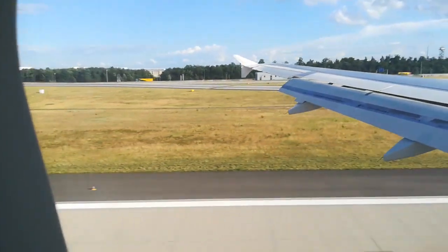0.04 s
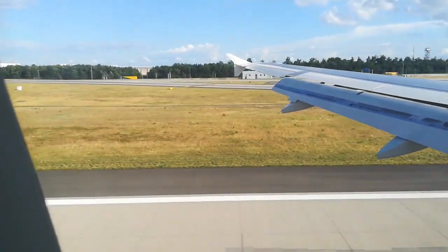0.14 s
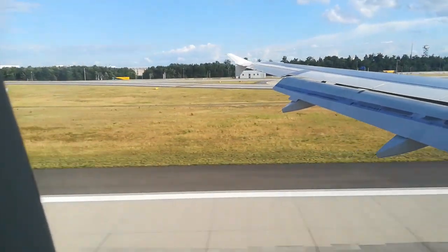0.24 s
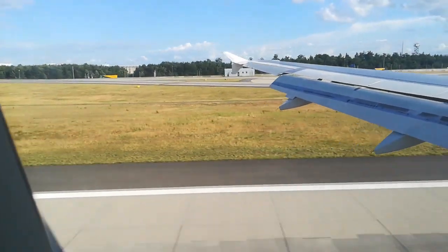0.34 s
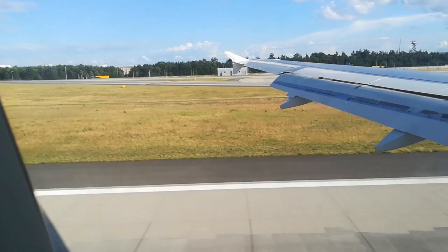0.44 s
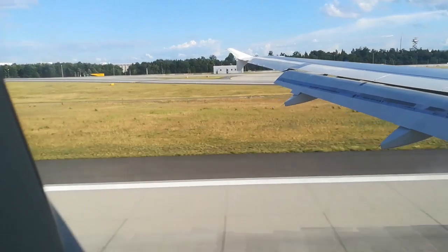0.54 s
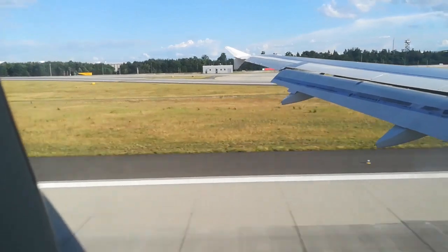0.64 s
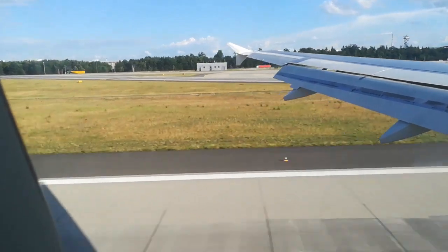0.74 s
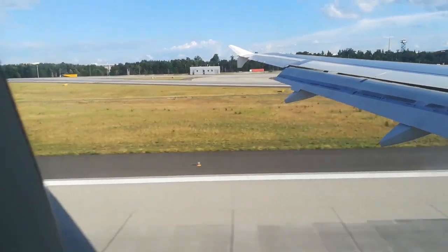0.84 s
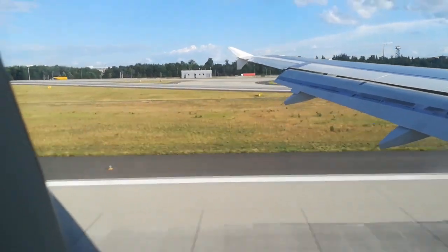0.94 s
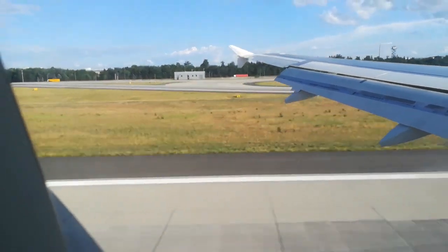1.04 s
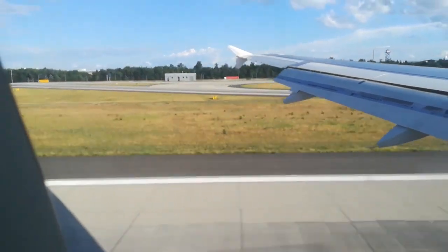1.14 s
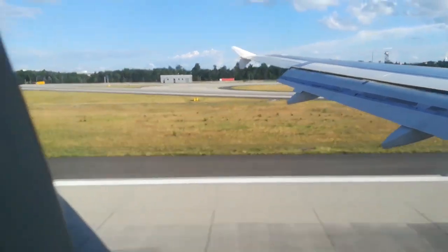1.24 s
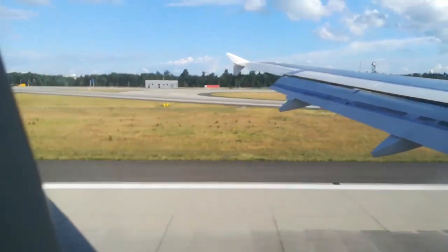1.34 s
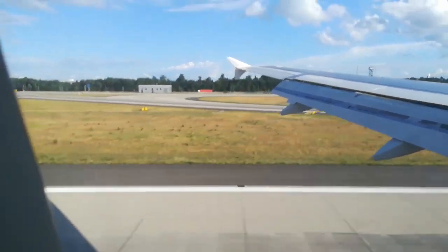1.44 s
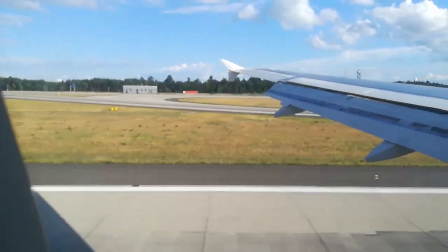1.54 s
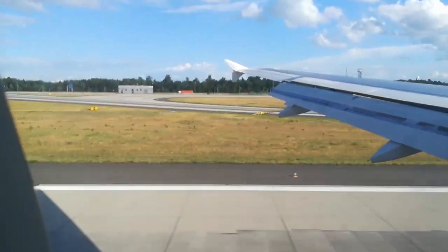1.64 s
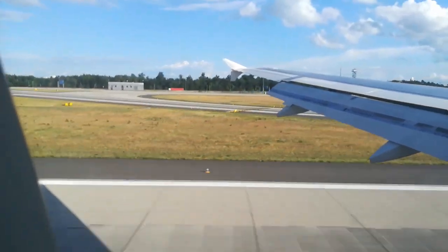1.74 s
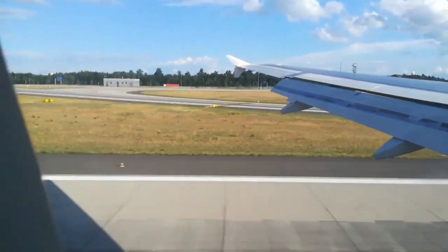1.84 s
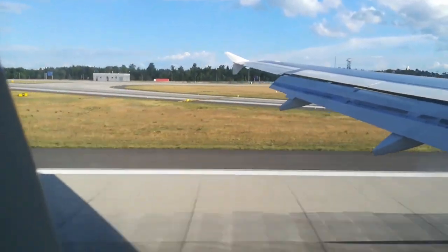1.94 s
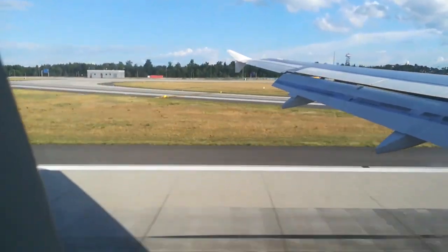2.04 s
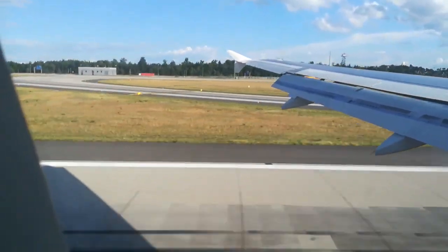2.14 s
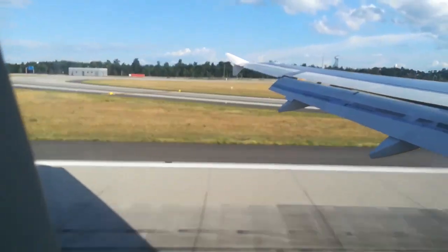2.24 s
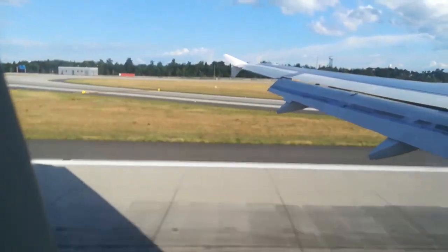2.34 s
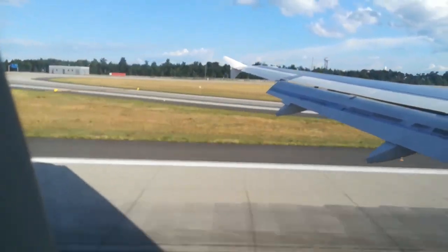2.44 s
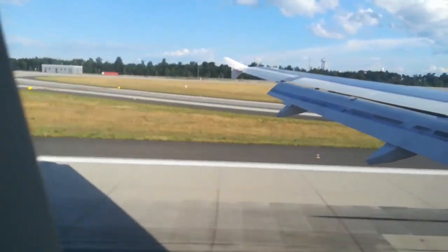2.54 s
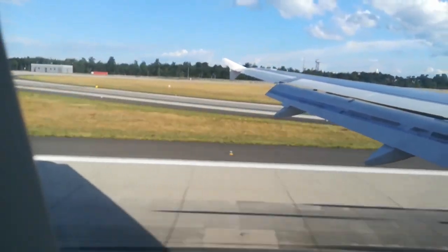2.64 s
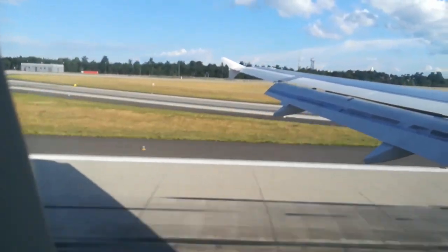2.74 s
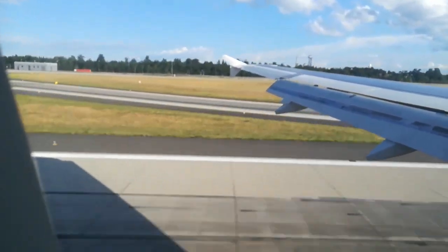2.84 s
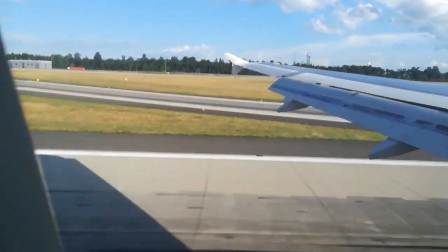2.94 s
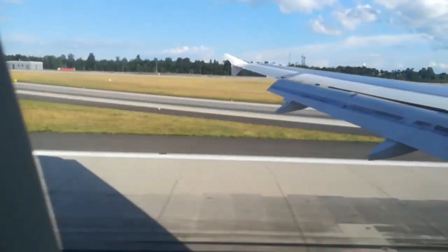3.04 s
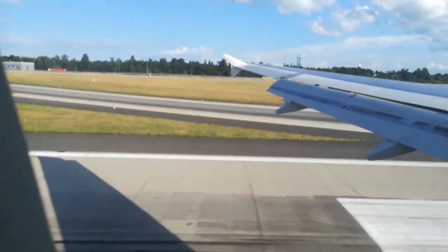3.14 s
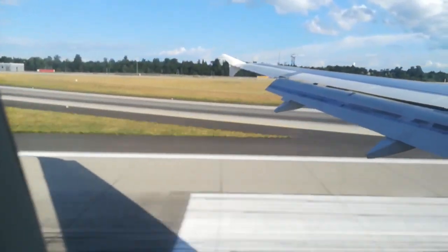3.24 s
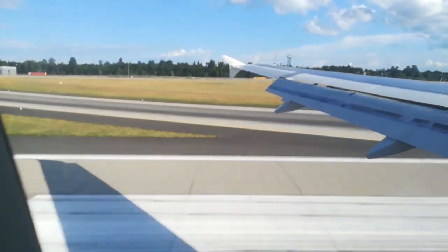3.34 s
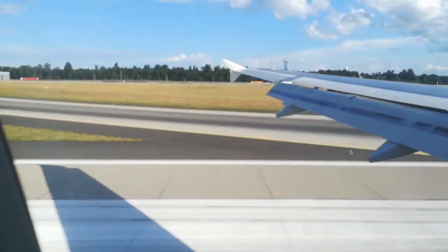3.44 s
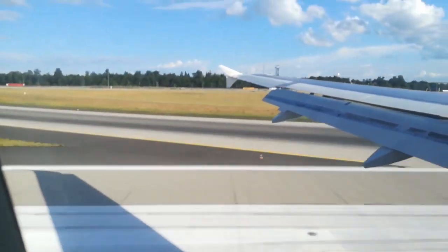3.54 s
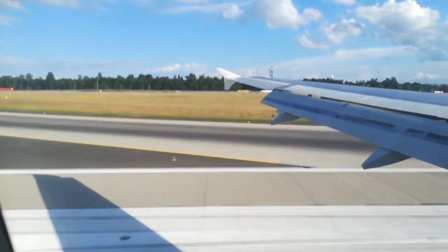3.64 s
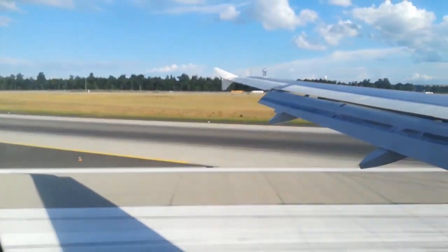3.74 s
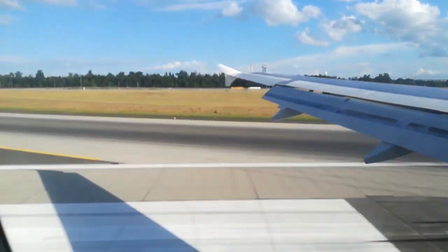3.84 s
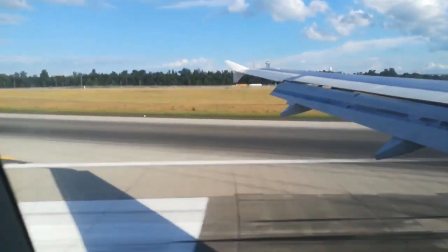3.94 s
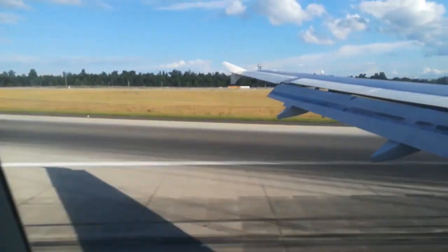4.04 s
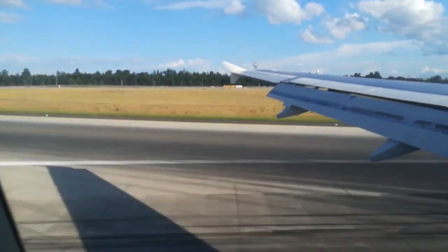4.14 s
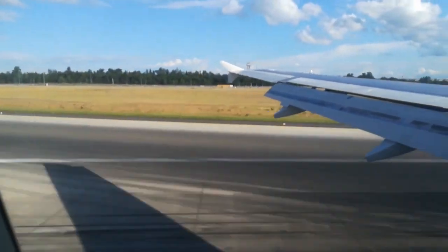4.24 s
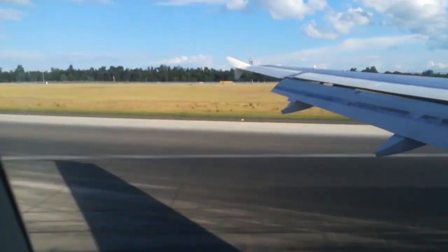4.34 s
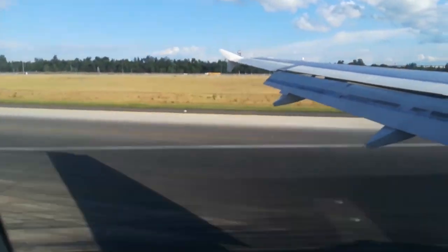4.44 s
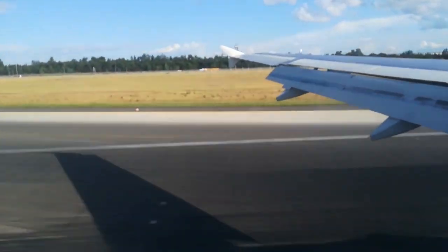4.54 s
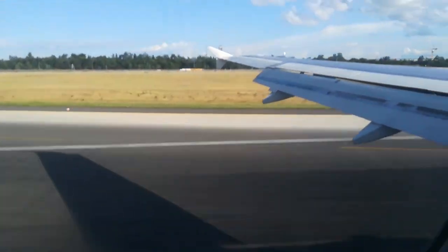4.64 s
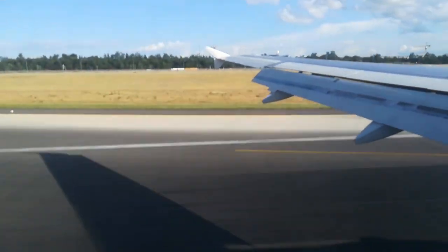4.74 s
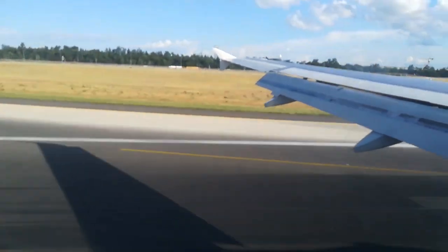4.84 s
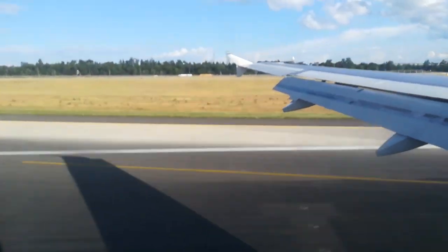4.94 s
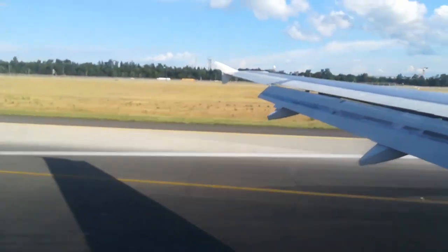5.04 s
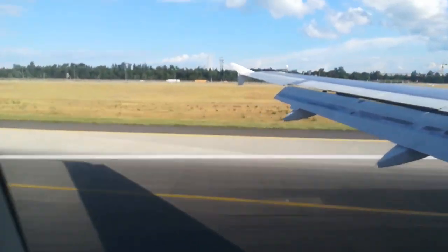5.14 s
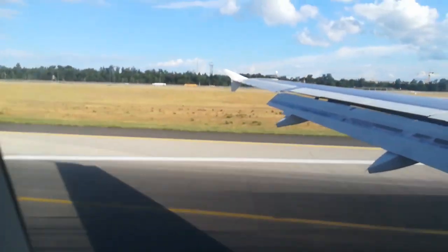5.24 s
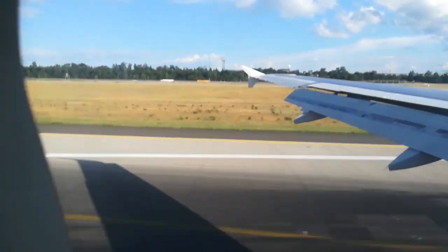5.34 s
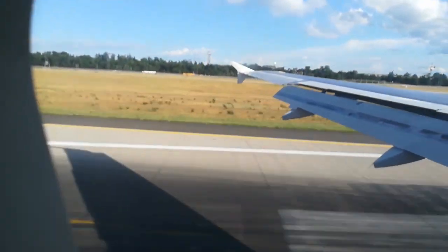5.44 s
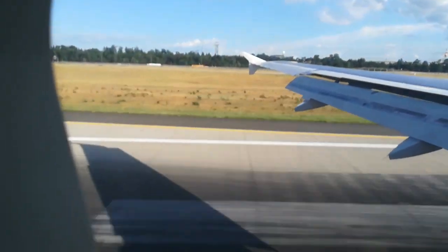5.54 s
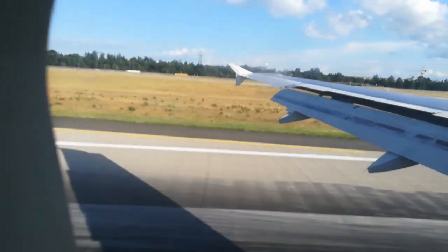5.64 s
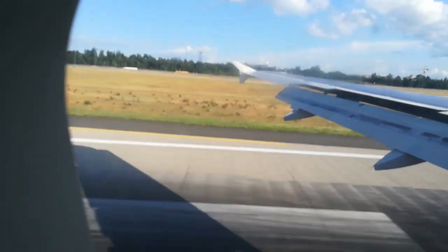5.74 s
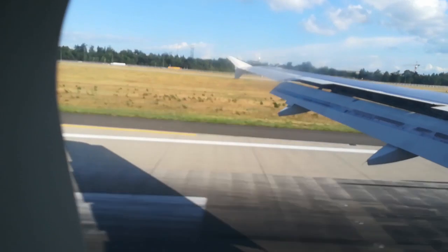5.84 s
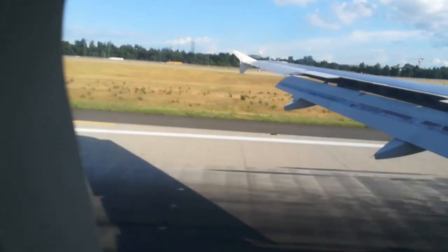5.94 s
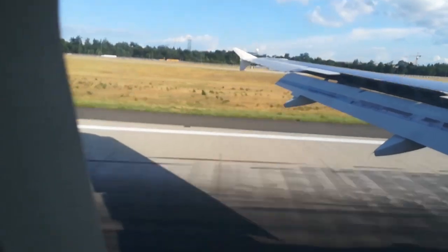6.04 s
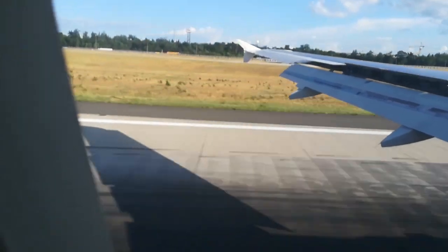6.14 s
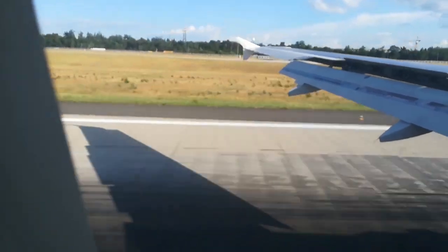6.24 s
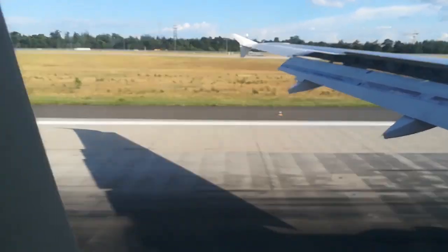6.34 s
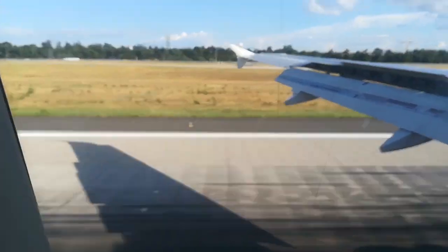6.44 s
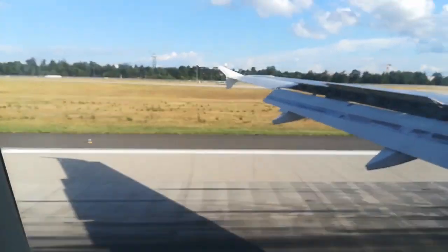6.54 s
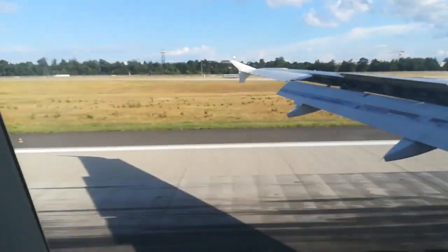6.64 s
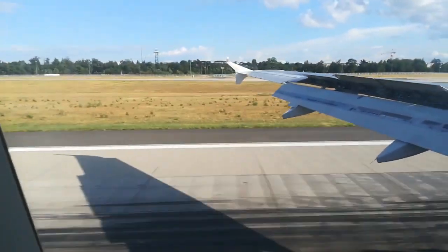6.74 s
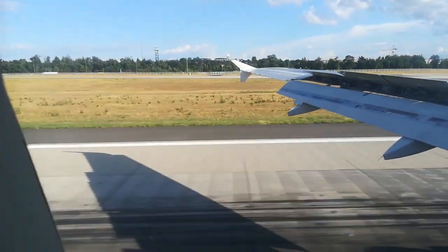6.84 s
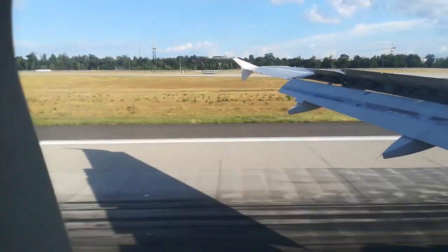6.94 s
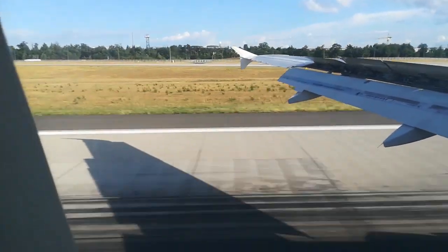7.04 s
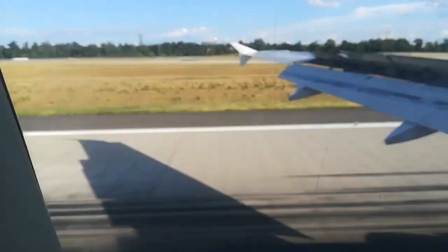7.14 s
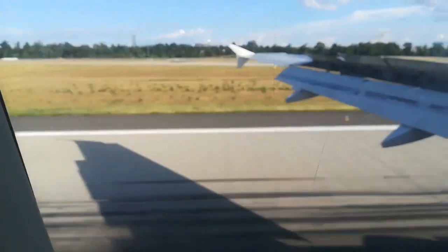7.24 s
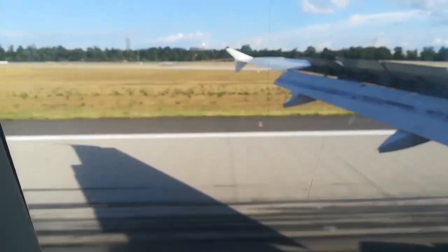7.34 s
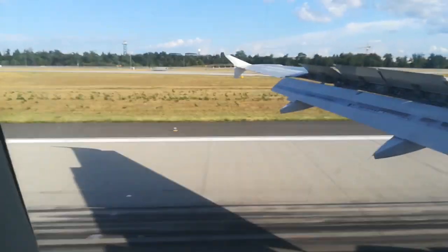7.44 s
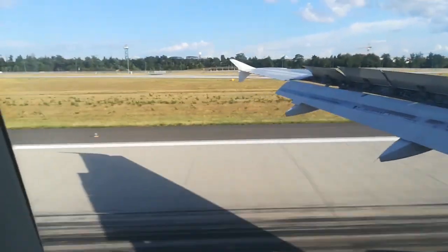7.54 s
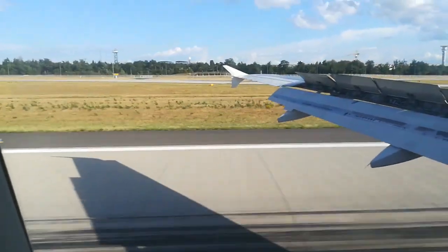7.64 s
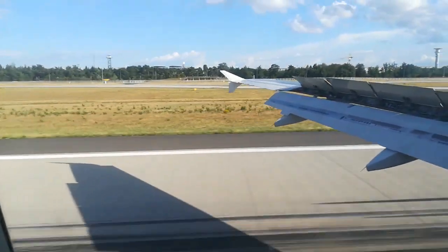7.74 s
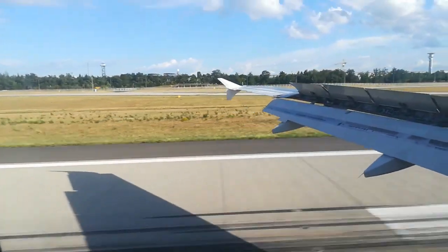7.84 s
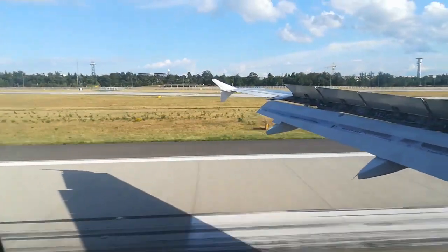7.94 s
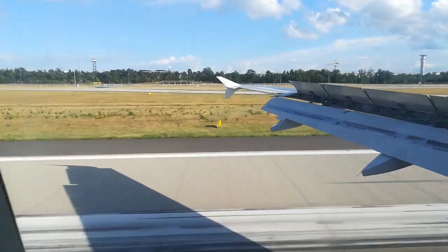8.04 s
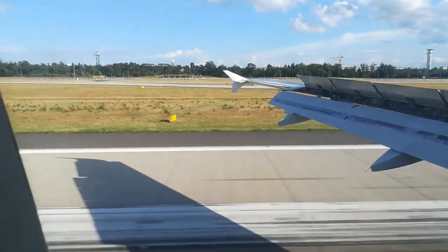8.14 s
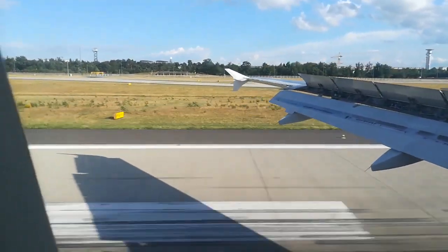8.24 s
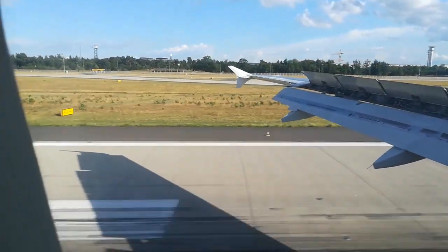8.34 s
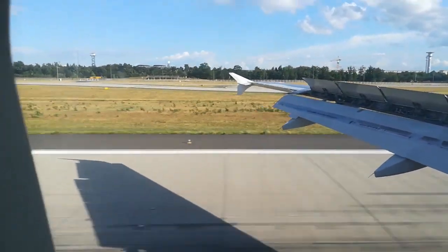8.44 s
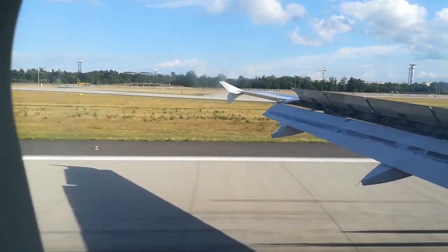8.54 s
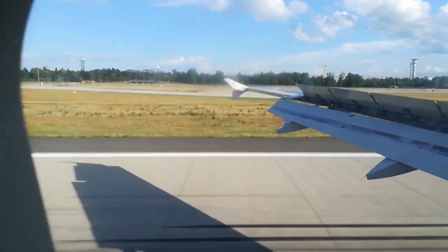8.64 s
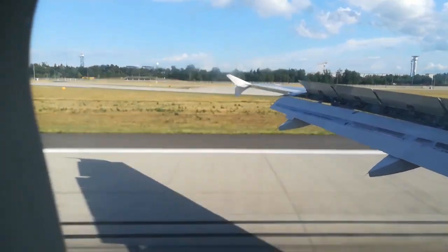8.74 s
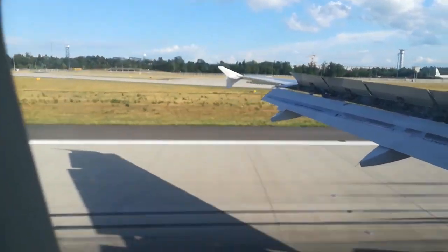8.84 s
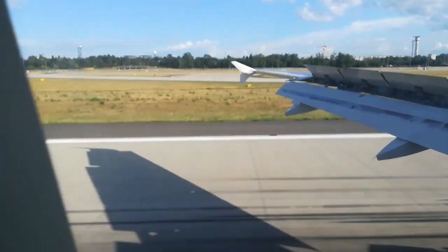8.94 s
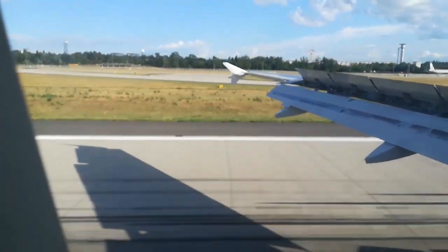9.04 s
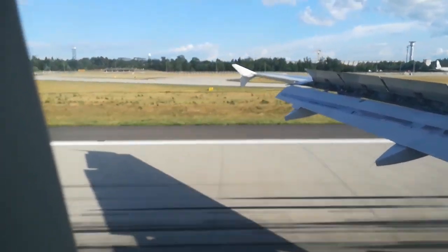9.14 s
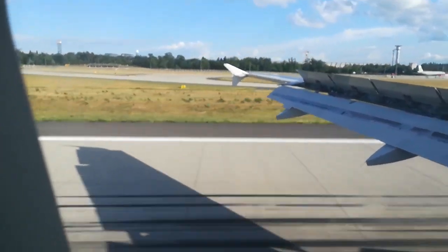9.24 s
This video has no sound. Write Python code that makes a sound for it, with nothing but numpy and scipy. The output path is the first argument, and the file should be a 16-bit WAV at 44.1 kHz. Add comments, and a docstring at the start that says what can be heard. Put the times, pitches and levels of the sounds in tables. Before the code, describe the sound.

A window-seat landing: bassy rushing air and thin whine, a clattering thump, then growing wheel rumble with rustling, rattling plastic trim.

```python
"""Airliner landing, heard from a window seat

Airflow is shaped noise in the cabin's standing waves; winding-down fans and a thin whine are wavering tones.
Touchdown thumps ring damped fuselage modes, then a deep rumble and roar of noise build up with the wheel load.
Plastic trim rustles and squeaks, panels clack, and dull rattles, bright chatters and dry ticks come and go, all
from random micro-impacts; one metal fitting clinks as a set of short ringing modes."""
import sys
import numpy as np
from scipy import signal
from scipy.fft import rfft, irfft, next_fast_len
from scipy.io import wavfile
from scipy.ndimage import uniform_filter1d

SR = 44100
rng = np.random.default_rng(int(sys.argv[2]) if len(sys.argv) > 2 else 0)


def dump_mix(stems):
    """Bounce the given channels to the path in sys.argv[1] as a 16-bit WAV at rate SR."""
    frames = np.atleast_2d(stems).T  # one column per channel
    limited = np.clip(frames, -1, 1)  # hard clip at full scale
    pcm = np.round(limited * 32767).astype(np.int16)
    wavfile.write(sys.argv[1], SR, pcm)


N = 409688
TIME = np.arange(N) / SR


def from_db(db):
    """Decibels to gain."""
    return 10 ** (np.asarray(db) / 20)


def rms(x):
    """Root mean square."""
    return np.sqrt(np.mean(x ** 2) + 1e-20)


def colour(x, points):
    """Filter by a (f/Hz, level/dB) spectrum, interpolated over log frequency."""
    size = x.shape[-1]
    hz, db = np.transpose(points)
    bins = np.maximum(np.fft.rfftfreq(size, 1 / SR), 1)
    gain = from_db(np.interp(np.log(bins), np.log(hz), db))
    return irfft(rfft(x) * gain, size)


def butter(x, hz, kind, order=2):
    """Causal low-, high- or band-pass."""
    return signal.sosfilt(signal.butter(order, hz, kind, fs=SR, output="sos"), x)


def split(x, hz):
    """The parts below and above a frequency; they add up to the whole."""
    sos = signal.butter(3, hz, fs=SR, output="sos")
    low = signal.sosfiltfilt(sos, x, padtype="even")
    return low, x - low


def pan(db):
    """Gains of the two channels for a left-right difference."""
    return from_db(np.array([[db / 2], [-db / 2]]))


def drift(rate):
    """Smooth random wandering with a spread of about 1, from this many random points per second."""
    knots = rng.standard_normal(2000)
    return np.interp(TIME * rate, np.arange(len(knots)), knots) * np.sqrt(3 / 2)


def swells(rows):
    """Sum of bell-shaped swells, one for each (t/s, height, length/s) row."""
    return sum(height * np.exp(-np.minimum((2 * (TIME - s) / length) ** 2, 50))
               for s, height, length in rows)


def steady(x, seconds):
    """Noise with its slow swells evened out, rms about 1."""
    power = uniform_filter1d(np.mean(x, axis=0) ** 2, int(seconds * SR))
    return x / np.sqrt(power + 1e-12)


def impulses(rows):
    """One click for each (t/s, level/dB) row."""
    out = np.zeros(N)
    for s, db in rows:
        out[round(s * SR)] = from_db(db)
    return out


def ring(clicks, hz, t60):
    """A damped resonator: a unit click sets a decaying sine of initial height 1 ringing."""
    radius = from_db(-60 / (t60 * SR))
    angle = 2 * np.pi * hz / SR
    return signal.lfilter([0, np.sin(angle)], [1, -2 * radius * np.cos(angle), radius ** 2], clicks + 1e-18)


def resonance_db(modes, hz):
    """Lift that (f/Hz, width/Hz, lift/dB) resonances give at a frequency."""
    return sum(db / (1 + (2 * (hz - centre) / width) ** 2) for centre, width, db in modes)


def body(x, hz, width_hz, lift_db):
    """A sound together with the resonance that it excites in a part."""
    resonance = signal.lfilter(*signal.iirpeak(hz, hz / width_hz, fs=SR), x + 1e-18)
    return x + from_db(lift_db) * resonance


# resonances of the cabin and its air vents: f/Hz, width/Hz, lift/dB
CABIN_MODES = [(44.4, 1.55, 7), (75, 11, -2), (130, 12, -4.5), (172, 16, 1.5), (354.3, 13.6, 3.5),
               (399.4, 17, 5.5), (3190, 360, 3.5), (5040, 780, 4.5), (9400, 1300, 3.5)]
PORT_LAG_S = 0.00063  # travel time between the two pickup ports


def cabin_field(common, difference, side_db, directed):
    """Noise in the cabin's standing waves, at two close ports; the directed share gives them a phase lag."""
    size = next_fast_len(N, real=True)
    hz = np.fft.rfftfreq(size, 1 / SR)
    modes = from_db(resonance_db(CABIN_MODES, hz))
    pressure, diffuse = rfft(rng.standard_normal((2, size))) * modes
    # direction is clear in the bass and blurs towards the treble
    directness = np.interp(hz, [100, 500, 1200, 6000], [1, .7, .45, .2])
    lag = np.tanh(4 * np.sin(2 * np.pi * hz * PORT_LAG_S))
    share = np.clip(directed, 0, 1) * lag * directness
    gradient = -1j * share * pressure + np.sqrt(1 - share ** 2) * diffuse
    mid = colour(irfft(pressure, size), common)[:N]
    side = colour(irfft(gradient, size), difference)[:N]
    return mid / rms(mid) + from_db(side_db) * side / rms(side) * [[1], [-1]]


def wavering_tone(hz, level_db, width_hz):
    """A tone whose strength and phase are scattered by turbulence, differently at each port."""
    times = np.arange(0, N / SR + 1, 1 / max(width_hz, 1))
    scatter = []
    for _ in range(2):
        knots = rng.standard_normal(len(times)) + 1j * rng.standard_normal(len(times))
        scatter.append(np.interp(TIME, times, knots))
    carrier = np.exp(2j * np.pi * np.cumsum(hz) / SR)
    tone = np.real((.5 + np.array(scatter)) * carrier)
    return from_db(level_db) * tone / rms(tone)


def grains(size, per_s, spread_db, diffuse_db):
    """Stereo micro-impacts of uneven strength in a wash of their reflections, rms 1."""
    strength = from_db(spread_db * rng.standard_normal(size).clip(-2, 2))
    hits = (rng.random(size) < per_s / SR) * rng.choice([-1, 1], size) * strength
    x = hits / rms(hits) + from_db(diffuse_db) * rng.standard_normal((2, size))
    return x / rms(x)


def window_nook(x, count=14):
    """Window, wall and seat backs return quick echoes, other ones at each port, which ripple the spectrum."""
    out = []
    for channel in x:
        lag_s = rng.uniform(.0006, .008, count)
        response = np.zeros(SR // 100)
        response[(lag_s * SR).astype(int)] = .35 * rng.choice([-1, 1], count) * np.exp(-lag_s / .005)
        response[0] = 1  # direct sound
        out.append(signal.oaconvolve(channel, response / np.linalg.norm(response))[:len(channel)])
    return np.array(out)


def shower(s, db, t60, spectrum, rise_s, per_s):
    """One contact: a short shower of micro-impacts in a part, dying away, with the echoes of its own place."""
    out, size = np.zeros((2, N + SR)), SR // 2
    age = np.arange(size) / SR
    burst = colour(grains(size, per_s, spread_db=4, diffuse_db=-2), spectrum)
    decay = from_db(-60 * np.maximum(age - rise_s, 0) / max(t60, .005))
    envelope = np.minimum(age / rise_s, 1) * decay
    start = round((s - rise_s / 2) * SR)
    out[:, start:start + size] = window_nook(from_db(db) * envelope * burst / rms(burst))
    return out[:, :N]


CONTACT_S = 4.2  # the wheels touch


def on_ground(rise_s):
    """0 in the air, rising to 1 after the first contact."""
    return np.clip((TIME - CONTACT_S) / rise_s, 0, 1)


# the spoilers rise and hand the weight to the wheels; later the roll eases as the aircraft slows
SPOILERS_S, LOAD_TIME_S, SLOWING_S, EASE_PER_S = 5.57, 0.68, 8.32, 0.11


def wheel_load():
    """How hard the wheels work, 0-1: it builds once the spoilers are up and eases with the speed."""
    weight = 1 - np.exp(-np.maximum(TIME - SPOILERS_S, 0) / LOAD_TIME_S)
    return weight * np.exp(-EASE_PER_S * np.maximum(TIME - SLOWING_S, 0))


# airflow and engine noise, in common to both ports and as their difference: f/Hz, relative level/dB
AIR_COMMON = [(12, -59), (30, -6.5), (54, -1), (125, -7), (182, -9.5), (316, -20), (377, -29.5),
              (462, -29.5), (600, -40.5), (927, -43.5), (1430, -46.5), (3050, -52.5), (6300, -65),
              (15500, -69)]
AIR_DIFFERENCE = [(10, -41), (70, -6), (118, -3), (258, 0), (335, -3.5), (388, -9.5), (448, -5.5),
                  (549, -8), (900, -12), (1430, -25), (2210, -21), (3420, -30.5), (15500, -47)]
# a gust and two lulls in the bass of the airflow: t/s, level change/dB, length/s
GUSTS = [(0.84, -2, 0.18), (1.25, 6, 0.16), (2.1, -11, 0.096)]
AIR_DB, AIR_SIDE_DB, BUFFET_DB = -28, -45.5, -27.5


def airflow():
    """The steady rush of the cabin, whose bass swells and sinks with the gusts."""
    field = cabin_field(AIR_COMMON, AIR_DIFFERENCE, AIR_SIDE_DB - AIR_DB, directed=0.89)
    bass, rush = split(field, hz=109)
    bass_gain = from_db(BUFFET_DB + swells(GUSTS))
    return bass_gain * steady(bass, seconds=0.21) + from_db(AIR_DB) * rush


# resonances of the wall that the hum passes through: f/Hz, width/Hz, lift/dB
WALL_MODES = [(455.5, 13, 13), (407, 10.4, 11)]
# the fans wind down to idle; they are half way there after SPOOL_S
FAN_START_HZ, FAN_IDLE_HZ, SPOOL_S = 463, 401, 2.4


def fan_hum():
    """The hum sinks as the fans slow down and swells as it passes through resonances of the wall."""
    hz = FAN_IDLE_HZ + (FAN_START_HZ - FAN_IDLE_HZ) / (1 + (TIME / SPOOL_S) ** 3)
    return wavering_tone(hz, -64.5 + resonance_db(WALL_MODES, hz), width_hz=21)


# moments when the whine comes forward: t/s, added level/dB, length/s
WHINE_SWELLS = [(1.1, 4.5, 0.8), (2.92, 4, 0.35), (5.6, 3, 0.7)]
WHINE_HZ, WHINE_SAG_HZ_PER_S, WHINE_WANDER_HZ = 923, 1.7, 3.58
WHINE_DB, WHINE_FADE_DB_PER_S = -64, 0.25


def engine_whine():
    """A thin tone sags and fades slowly, wanders in pitch and swells now and then."""
    hz = WHINE_HZ - WHINE_SAG_HZ_PER_S * TIME + WHINE_WANDER_HZ * drift(rate=3)
    level_db = WHINE_DB - WHINE_FADE_DB_PER_S * TIME + swells(WHINE_SWELLS)
    return wavering_tone(hz, level_db, width_hz=22)


# dull rattles and growls: far panels, tyre scrub, the low part of a knock:
# t/s, level/dB, length/s, centre f/Hz
DULL_RATTLES = [(4.565, -53, 0.058, 663), (4.723, -57, 0.17, 1500), (5.198, -57, 1.0, 670),
                (6.335, -49, 0.04, 810), (6.48, -57, 0.1, 680), (7.32, -52, .07, 1060),
                (8.04, -57, 0.089, 1700), (8.32, -54, 0.057, 1150)]
RATTLE_WIDTH_OCTAVES = 0.75


def dull_rattles():
    """Dense micro-impacts, heard as dull rattles and growls that surge in one band each."""
    rattle = grains(N, per_s=400, spread_db=2.0, diffuse_db=0.5)
    edges = 2 ** (RATTLE_WIDTH_OCTAVES * np.array([-.5, .5]))
    out = 0
    for s, db, length, hz in DULL_RATTLES:
        band = butter(rattle, hz * edges, "band")
        out = out + swells([(s, from_db(db), length)]) * band / rms(band)
    return out


# chance rubs: rate per second and level in the air and on the ground
AIR_RUBS_PER_S, GROUND_RUBS_PER_S, AIR_RUB_DB, GROUND_RUB_DB = 2.2, 8.2, -59.5, -63.5


def faint_rubs():
    """Chance rubs as (t/s, level/dB) rows: rare in the air, frequent but fainter on the ground."""
    rolling = TIME > CONTACT_S
    born = rng.random(N) < np.where(rolling, GROUND_RUBS_PER_S, AIR_RUBS_PER_S) / SR
    levels = np.where(rolling, GROUND_RUB_DB, AIR_RUB_DB)
    return list(zip(TIME[born], levels[born]))


# tone of the sliding trim: f/Hz, relative level/dB
TRIM_TONE = [(700, 5.5), (1800, 8.5), (5000, 6.5), (6500, 2.5), (9000, 0.5), (12000, -3.5), (15500, -9)]
# the trim rustles on the ground, more under load, and by so many dB for each dB of shaking
RUSTLE_DB, RUSTLE_LOAD_DB, RUSTLE_PER_SHAKE = -68, 3.5, 2.25
RUB_LENGTH_S = 0.075


def trim_rustle():
    """Plastic trim slides in small uneven slips with sparser catches, swelling with shaking and faint rubs."""
    size = next_fast_len(N, real=True)
    friction = grains(size, per_s=1500, spread_db=5, diffuse_db=14)
    catches = grains(size, per_s=45, spread_db=3, diffuse_db=-30)
    slips = colour(friction + .3 * catches, TRIM_TONE)[:, :N]
    rustle_db = RUSTLE_DB + RUSTLE_LOAD_DB * wheel_load() + RUSTLE_PER_SHAKE * swells(SHAKES)
    rustle = on_ground(TYRE_RISE_S) * from_db(rustle_db)
    rub_power = swells([(s, from_db(db) ** 2, RUB_LENGTH_S) for s, db in faint_rubs()])
    flicker = from_db(2.14 * drift(rate=60))
    return np.sqrt(rustle ** 2 + rub_power) * flicker * slips / rms(slips)


# rubs of the trim at set moments as the cabin flexes:
# t/s, level/dB before the squeak, length/s, squeak f/Hz
RUBS = [(0.197, -64, .07, 3900), (0.348, -61, 0.076, 2100), (0.48, -65, 0.084, 2700),
        (4.765, -57, 0.084, 8950), (5.31, -59.5, 0.06, 7500), (6.547, -59.5, 0.065, 9500),
        (6.615, -60, 0.03, 7500), (6.658, -55, 0.055, 14000), (6.722, -61, 0.057, 13600),
        (6.826, -56, 0.051, 15000), (7.729, -52.5, 0.033, 5500), (8.202, -61, 0.086, 8600)]
# tone of the scraping edges: f/Hz, relative level/dB
RUB_TONE = [(700, -13), (2000, 5.5), (5000, 2.5), (9000, -0.5), (12000, -1), (15500, -9)]
SQUEAK_WIDTH_HZ, SQUEAK_DB = 790, 3


def rubs():
    """Panel edges scrape in short, bright strokes, each with a squeak of its own."""
    size = next_fast_len(N, real=True)
    slips = colour(grains(size, per_s=3000, spread_db=4.0, diffuse_db=5), RUB_TONE)[:, :N]
    slips = from_db(2.3 * drift(rate=130)) * slips / rms(slips)
    return sum(body(swells([(s, from_db(db), length)]) * slips, hz, SQUEAK_WIDTH_HZ, SQUEAK_DB)
               for s, db, length, hz in RUBS)


# short rattling showers of light plastic, and the crack of the clinking fitting:
# t/s, level/dB before the trim below, t60/s
CHATTERS = [(5.586, -30, 0.077), (7.4433, -40.5, 0.14), (7.4706, -38, 0.1), (7.572, -39, 0.088),
            (7.758, -29.5, 0.018)]
# bright tone of these parts, shared with the ticks: f/Hz, relative level/dB
BRIGHT_TONE = [(1500, -5), (4300, 0), (5100, 3), (7500, 0), (10000, 1.5), (12000, -2), (14500, -0.5),
               (16000, -4)]


def chatters():
    """Light plastic rattles in short showers and the clinking fitting cracks, all a little to the right."""
    return pan(-3) * sum(shower(s, db - 9, t60, BRIGHT_TONE, rise_s=0.0026, per_s=1300)
                         for s, db, t60 in CHATTERS)


# thin dry ticks, one of them the snap of the clink:
# t/s, level/dB before the trim below, left-right difference/dB
TICKS = [(2.128, -30, 31), (3.1273, -34, -6), (4.1874, -31, -2), (4.7232, -33, 14), (5.5254, -31, -4.5),
         (5.917, -29, -6), (7.758, -24, -5), (8.3412, -29, 10)]


def ticks():
    """Thin dry ticks: very short showers of micro-impacts without their lows, each from its own side."""
    full_ticks = sum(pan(side) * shower(s, db - 16, .0078, BRIGHT_TONE, rise_s=.001, per_s=3400)
                     for s, db, side in TICKS)
    return butter(full_ticks, 6600, "high", order=4)


# a metal fitting hitting its stop: t/s, strike level/dB before the trim below
CLINKS = [(7.758, -27.5)]
# modes of the fitting: f/Hz, relative level/dB
FITTING_MODES = [(2600, 0), (3620, -5), (4900, -2), (5600, -1), (6720, 3), (7450, 1), (8900, -3),
                 (10780, -2), (13850, -9), (15200, -7)]


def clink():
    """A quickly damped metal fitting rings once, its modes starting a hair apart with alternating sign."""
    strike = impulses(CLINKS)
    ringing = 0
    for k, (hz, db) in enumerate(FITTING_MODES):
        delayed = np.roll(strike, rng.integers(0, 60))
        ringing = ringing + from_db(db) * (-1) ** k * ring(delayed, hz, t60=.025)
    return from_db(-13.5) * pan(-1.5) * ringing


# wall panels and bins knocking:
# t/s, level/dB before the trim below, t60/s, body resonance f/Hz, its width/Hz, its strength/dB
CLACKS = [(4.5292, -39, 0.055, 4800, 1200, 10), (4.541, -36.5, 0.12, 1800, 500, 9),
          (4.5393, -36, 0.093, 4250, 800, 14), (4.5432, -30, 0.032, 5000, 1500, 3),
          (4.5595, -28, 0.035, 4600, 1500, 3), (4.561, -32.5, 0.075, 1120, 600, 6),
          (4.571, -42, 0.13, 4500, 1500, 3), (6.04, -41, 0.023, 4270, 1000, 9),
          (6.324, -34, 0.027, 3400, 700, 14), (6.328, -32.5, 0.061, 4200, 1410, 12.5),
          (6.3355, -37.5, 0.068, 4180, 1000, 15), (6.351, -43, 0.14, 4900, 600, 4),
          (7.654, -43, 0.039, 4200, 900, 13), (7.8345, -35.5, 0.11, 3400, 2000, 5),
          (7.857, -42, 0.1, 2800, 2000, 6.5), (8.021, -35, 0.17, 4900, 149.7, 12),
          (8.3408, -31.5, 0.012, 1500, 1400, -1)]
# tone of a panel: f/Hz, relative level/dB
PANEL_TONE = [(400, 7), (1000, 7), (1800, 3.5), (2700, -1), (4200, -1), (6000, -3.5), (9500, -8),
              (12000, -12), (15500, -12)]
CLACK_RISE_SHARE = .06  # rise time as a share of the t60: short knocks are also sharper


def clacks():
    """Each knocking panel adds the resonance of its own body, broad for a crack and narrow for a ring."""
    out = 0
    for s, db, t60, hz, width, lift in CLACKS:
        knock = shower(s, db - 7.5, t60, PANEL_TONE, rise_s=CLACK_RISE_SHARE * t60, per_s=2000)
        out = out + body(knock, hz, width, lift)
    return out


# jolts through the landing gear: t/s, strike level/dB before the low-pass, fuselage mode f/Hz
THUMPS = [(4.298, -16.5, 73.4), (4.562, -11, 67), (4.631, -9.5, 68), (4.647, -11, 64.5), (4.707, -10, 45.8),
          (7.811, -9, 45.3), (8.679, -7.5, 62)]


def thumps():
    """Each jolt of the gear rings a low, well damped mode of the fuselage."""
    return sum(ring(butter(impulses([(s, db)]), 190, "low"), hz, t60=0.15) for s, db, hz in THUMPS)


# the wheels on the runway, in common to both ports and as their difference: f/Hz, relative level/dB
ROLL_COMMON = [(7.1, -37), (12, -7), (55, 8), (120, -4.5), (157, -4.5), (196, -14), (239, -13.5),
               (299, -24.5), (350, -23), (400, -27.5), (535, -37.5), (700, -40.5), (818, -47), (2500, -59),
               (4300, -115)]
ROLL_DIFFERENCE = [(7.1, -58), (12, -23), (59, 1), (120, 1), (164, 2.5), (400, -11), (626, -10),
                   (1020, -21), (1170, -25), (2500, -38), (5500, -110)]
# bouts of heavy shaking, the first at touchdown: t/s, added rumble/dB, length/s
SHAKES = [(4.62, 4.5, 0.3), (7.9, 4.5, 0.89), (8.62, 3.5, 0.15)]
CONTACT_RISE_S, TYRE_RISE_S = 0.12, 0.23  # the tyres take a moment to bite
# gear rumble and tyre roar on lightly loaded wheels, and what the full load adds
RUMBLE_DB, RUMBLE_LOAD_DB, ROAR_DB, ROAR_LOAD_DB = -28, 3.5, -41.5, 15
ROAR_DULLING_DB_PER_S = 8.5  # the top of the roar sinks first as the aircraft slows


def landing_roll():
    """Gear rumble and tyre roar come through the floor and grow with the load; the roar dulls with the speed."""
    field = cabin_field(ROLL_COMMON, ROLL_DIFFERENCE, side_db=-22.5, directed=0.94)
    rumble, roar = split(field, hz=118.6)
    dull, bright = split(steady(roar, seconds=0.272), hz=298)
    load = wheel_load()
    rumble_db = RUMBLE_DB + RUMBLE_LOAD_DB * load + swells(SHAKES)
    rumble_gain = on_ground(CONTACT_RISE_S) * from_db(rumble_db)
    roar_gain = on_ground(TYRE_RISE_S) * from_db(ROAR_DB + ROAR_LOAD_DB * load)
    brightness = from_db(-ROAR_DULLING_DB_PER_S * np.maximum(TIME - SLOWING_S, 0))
    return rumble_gain * steady(rumble, seconds=0.109) + roar_gain * (dull + brightness * bright)


# left-right balance of the two ports: f/Hz, difference/dB
PORT_BALANCE = [(60, -0.24), (250, 1), (600, -0.5), (1200, 3), (2500, 1), (5000, 3), (7500, -7.5),
                (15000, -8.5)]


def scene():
    """Drone and rumble fill the cabin under the small noises; each port colours all of it in its own way."""
    background = airflow() + fan_hum() + engine_whine() + dull_rattles()
    small_noises = window_nook(trim_rustle()) + rubs() + chatters() + ticks() + clink() + clacks()
    cabin = background + small_noises + thumps() + landing_roll()
    # run-in for the filters
    left, right = np.pad(cabin, [(0, 0), (SR, SR)], "reflect", reflect_type="odd")
    left = colour(left, [(hz, db / 2) for hz, db in PORT_BALANCE])
    right = colour(right, [(hz, -db / 2) for hz, db in PORT_BALANCE])
    return np.array([left, right])[:, SR:SR + N]


CUTOFF_HZ = 15850


def record(dry):
    """The largest peaks are rounded and the top is cut steeply."""
    rounded = dry / (1 + (dry / .44) ** 8) ** (1 / 8)
    return signal.sosfilt(signal.ellip(10, .1, 80, CUTOFF_HZ, fs=SR, output="sos"), rounded)


dry = scene()
out = record(dry)
dump_mix(out)
```